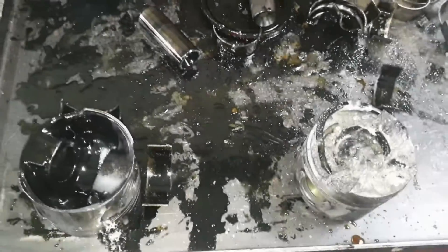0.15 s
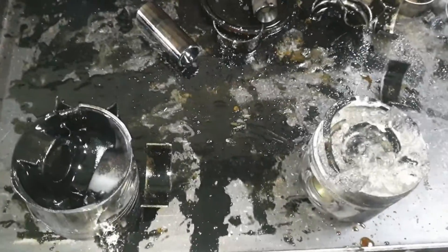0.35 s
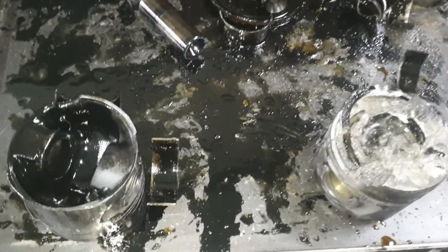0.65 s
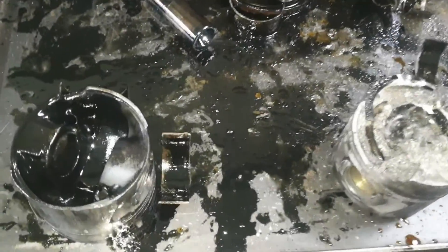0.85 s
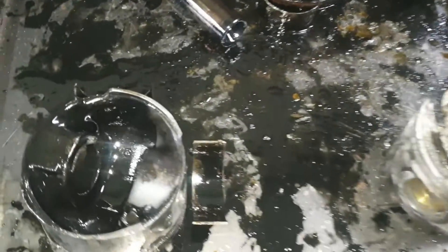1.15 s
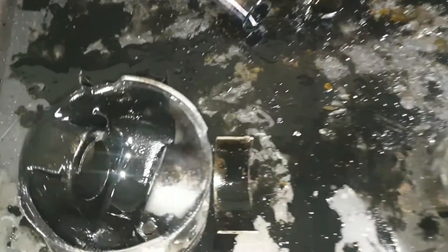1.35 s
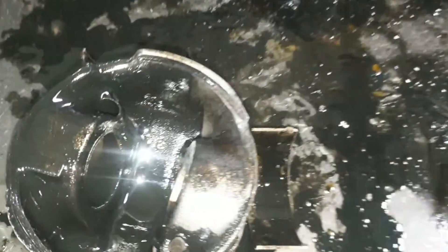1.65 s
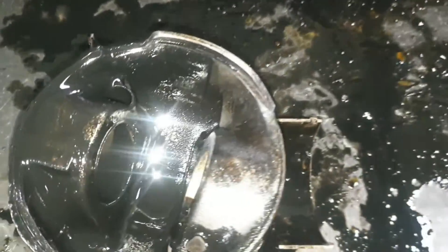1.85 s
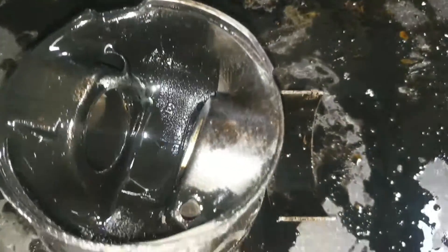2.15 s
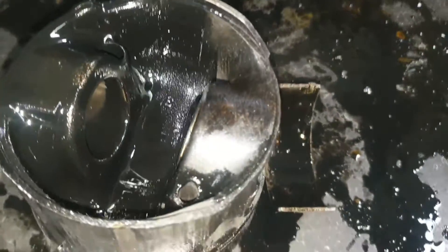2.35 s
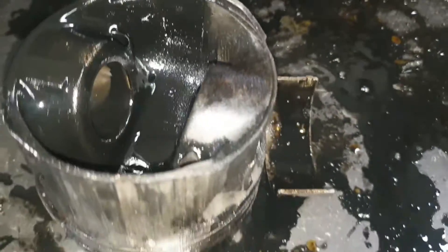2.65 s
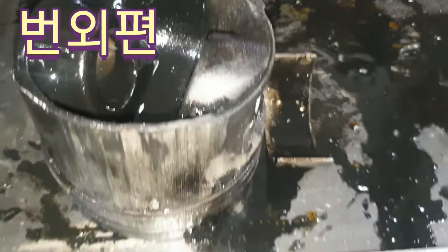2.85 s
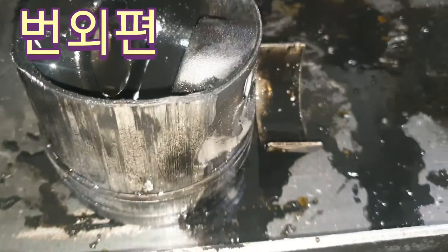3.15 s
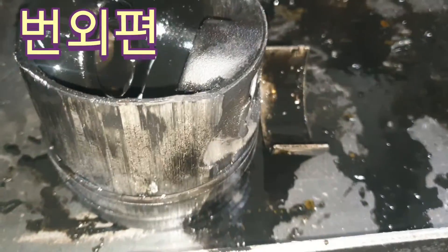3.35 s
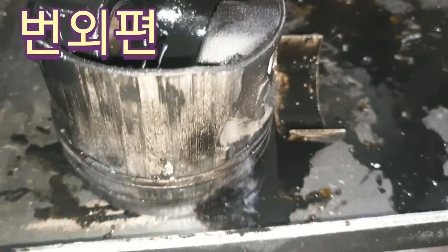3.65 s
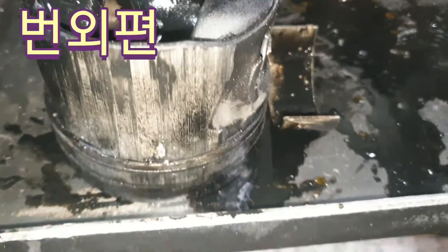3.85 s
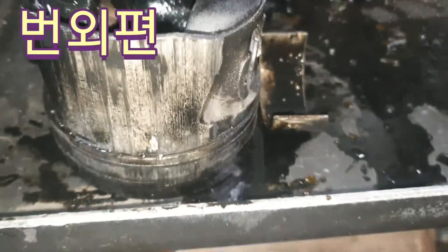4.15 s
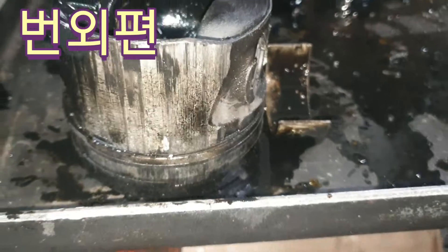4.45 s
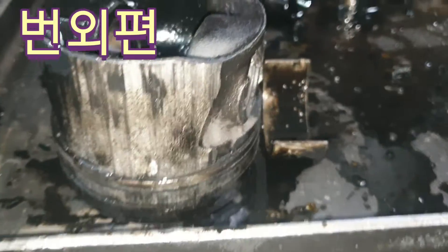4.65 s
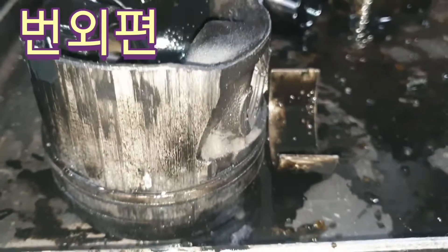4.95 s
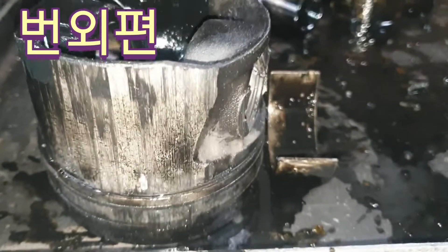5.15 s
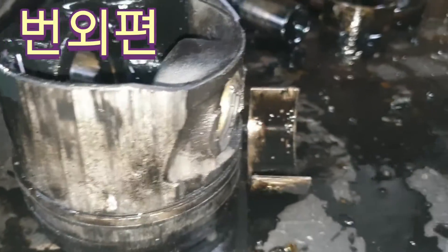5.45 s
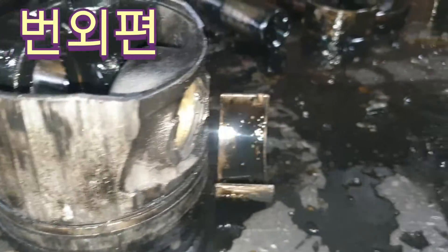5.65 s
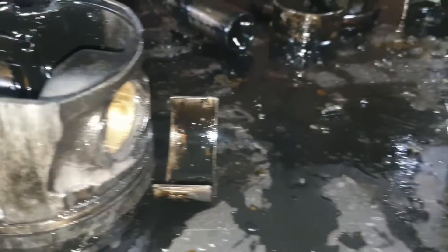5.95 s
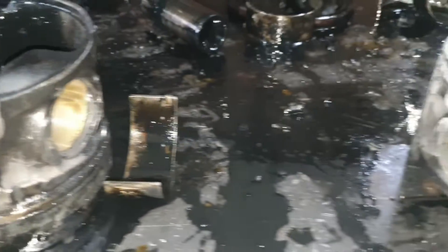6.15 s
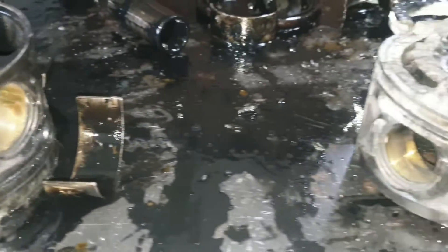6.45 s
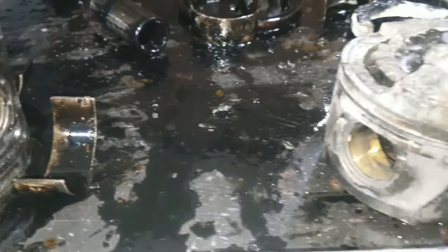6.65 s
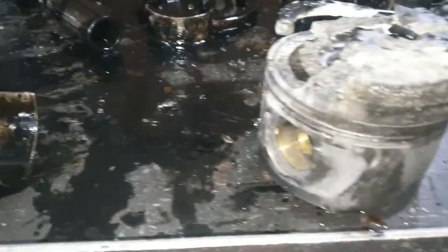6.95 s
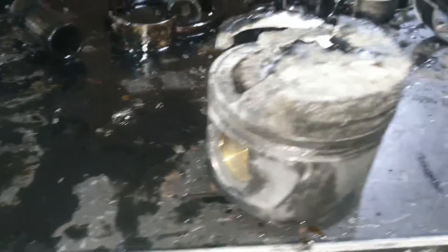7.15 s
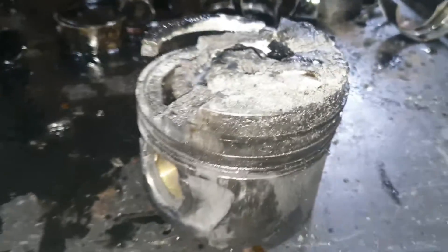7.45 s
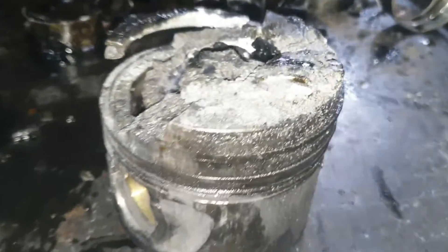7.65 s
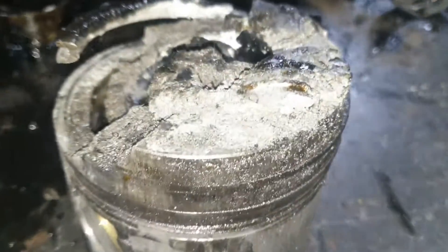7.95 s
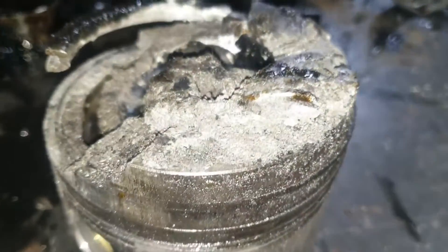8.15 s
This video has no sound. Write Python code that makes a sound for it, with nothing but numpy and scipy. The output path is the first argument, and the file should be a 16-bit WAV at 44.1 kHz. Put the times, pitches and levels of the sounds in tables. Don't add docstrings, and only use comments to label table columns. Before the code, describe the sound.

A pressurised air jet blows over metal engine parts on a bench. First only dull ventilation rumble and a slight swelling leak hiss; then the valve bursts open with two quick spurts. The wide, crisp hiss flutters and shifts between roar and fizz, flares strongly past the six-second point, thins, then whistles brightly near the end. Close handheld stereo microphone, dense short room response, jet stronger on the right.

```python
import sys
import numpy as np
from scipy import signal
from scipy.fft import rfft, irfft, next_fast_len
from scipy.io import wavfile
from scipy.ndimage import uniform_filter1d, map_coordinates

SR = 44100
rng = np.random.default_rng(int(sys.argv[2]) if len(sys.argv) > 2 else 0)


def boost(x):
    u = np.asarray(x, float) / 20
    return 10 ** u


def transcribe(signal):
    frames = np.atleast_2d(signal).T
    limited = np.clip(frames, -1, 1)
    pcm = np.round(limited * 32767).astype(np.int16)
    wavfile.write(sys.argv[1], SR, pcm)


N = 365588

LAYER_HZ = [550, 1500, 3900, 7400, 11500]


def unit(x):
    return x / np.sqrt(np.mean(x ** 2) + 1e-20)


def along(points, hz):
    f, v = np.transpose(points)
    return np.interp(np.log(hz + 1), np.log(f + 1), v)


def curves(rows):
    s, *columns = np.transpose(rows)
    return [np.interp(np.arange(N) / SR, s, column) for column in columns]


def wobble(rate):
    knots = rng.standard_normal(int(N * rate / SR) + 4)
    return map_coordinates(knots, [np.arange(N) * rate / SR])


def filtered(x, response):
    m = next_fast_len(x.shape[-1] + 4096)
    spectrum = rfft(x, m) * response(np.fft.rfftfreq(m, 1 / SR))
    return irfft(spectrum, m)[..., :x.shape[-1]]


def resonance(centre_hz, width_hz):
    return lambda hz: 1 / (1 + (2 * (hz - centre_hz) / width_hz) ** 2)


def pair(n, alike, lag_s, patchy_db):
    z = signal.stft(rng.standard_normal((2, n + 512)), nperseg=512)[2]
    patches = uniform_filter1d(rng.standard_normal(z.shape[1:]), size=3, axis=0)
    patches = uniform_filter1d(patches, size=16, axis=1)
    two = signal.istft(z * boost(patchy_db * unit(patches)), nperseg=512)[1][:, :n]

    def mid_side(hz):
        angle = np.arccos(np.clip(along(alike, hz), -1, 1)) / 2
        return np.array([np.cos(angle), np.sin(angle)])

    mid, side = filtered(two, mid_side)
    ports = np.array([mid + side, mid - side])
    return filtered(ports, lambda hz: np.exp(-1j * np.pi * np.outer([1, -1], hz) * lag_s))


def workshop():
    # time in seconds, level in dB.
    fan = [(0.0, -41.5), (1.34, -40.5), (1.94, -37.5), (2.22, -37), (3.8, -37.5), (4.66, -40),
           (5.42, -38.5), (5.9, -38), (6.72, -41), (8.29, -39.5)]
    # frequency in Hz, level in dB per Hz.
    rumble_colour = [(25, -13.5), (45, -0.5), (140, -4.5), (210, -11), (330, -15.5), (450, -18),
                     (650, -24.5), (1000, -28.5), (1500, -45.5), (2500, -77)]
    # frequency in Hz, width in Hz, level in dB.
    motor_lines = [(53, 4.2, -56), (80.4, 15, -51.5), (145.7, 11, -57), (217.7, 9.1, -64), (424, 2.6, -66),
                   (519, 8, -73.5), (782, 2.8, -71.5), (1460, 5.5, -76.5)]
    # frequency in Hz, likeness as a share.
    shop_alike = [(60, 0.83), (200, 0.92), (380, 0.5), (700, 0.12), (2000, 0.11)]
    # frequency in Hz, level in dB per Hz.
    duct_colour = [(900, -29.5), (1250, -5.5), (1500, -7.5), (2100, -9), (2800, -15.5), (4000, -19.5),
                   (11000, -19.5), (14700, -20.5)]
    # time in seconds, level in dB.
    leak = [
        (0, 3.5),
        (.5, 4),
        (.62, 8),
        (.73, 5.5),
    ]

    fan_db, leak_db = curves(fan)[0], curves(leak)[0]
    air = pair(N, shop_alike, 0, patchy_db=0.0)
    rumble = unit(filtered(air, lambda hz: boost(along(rumble_colour, hz))))
    duct = unit(filtered(air, lambda hz: boost(along(duct_colour, hz))))
    hum = np.zeros(N)
    for line_hz, width_hz, db in motor_lines:
        line = unit(filtered(rng.standard_normal(N), resonance(line_hz, width_hz)))
        follow_db = (fan_db + 41) * (line_hz < 300)
        hum += boost(db + follow_db) * line
    return boost(fan_db - 3.5 + 0.81 * wobble(5)) * rumble + hum + boost(leak_db - 66) * duct


def bench(x):
    t60_s, rise_s, answer_db = .16, .008, -7
    drift = .6
    t = np.arange(SR // 8) / SR
    tails = rng.standard_normal((2, 2, len(t))) * boost(-60 * t / t60_s) * (1 - np.exp(-(t / rise_s) ** 2))
    tails /= np.linalg.norm(tails, axis=2, keepdims=True)
    turn = np.pi * drift * np.arange(N) / SR
    paths = np.array([x * np.cos(turn), x * np.sin(turn)])
    answer = signal.oaconvolve(paths, tails, axes=2).sum(axis=0)[:, :N]
    return (x + boost(answer_db) * answer) / np.sqrt(1 + boost(2 * answer_db))


def bores():
    # time in seconds, half length in seconds, pitch in Hz, width in Hz,
    # level in dB.
    far_bores = [(4.39, .12, 12600, 353, -33), (4.935, .04, 8430, 500, -34), (3.2, 0.052, 8380, 600, -35.5),
                 (4.633, 0.024, 4190, 644, -34), (5.003, 0.059, 1760, 560, -32.5),
                 (6.14, 0.099, 10700, 840, -29.5), (6.51, 0.038, 9450, 2500, -26),
                 (6.432, 0.075, 8265, 835, -24), (6.752, 0.18, 10880, 630, -40.5),
                 (7.831, .12, 8250, 395, -29.5), (2.2, 0.18, 13560, 1300, -33),
                 (4.397, 0.069, 13360, 2100, -28), (6.438, .07, 10200, 1844, -19.5)]
    near_bores = [
        (1.33, 0.13, 2000, 457, -45),
        (1.78, 0.076, 1840, 244, -42.5),
        (2.497, 0.11, 4370, 620, -41),
        (5.74, 0.088, 1797, 350, -41),
        (6.41, .07, 7190, 714, -30),
        (7.79, .07, 5920, 895, -32),
        (7.803, .12, 7280, 705, -24.5),
        (8.158, 0.22, 7170, 640, -37),
        (3.198, 0.071, 13450, 1000, -28.5),
    ]
    held_bores = [(.82, .033, 1995, 400, -46.5), (.995, .075, 2122, 500, -36.5),
                  (1.0, .072, 3600, 450, -41), (1.01, .092, 5350, 220, -44), (2.19, .045, 3990, 260, -35),
                  (2.31, .06, 3930, 260, -39), (2.52, .07, 4970, 300, -42),
                  (5.375, 0.098, 6300, 1500, -38.5), (4.625, .04, 5200, 2500, -35),
                  (5.53, .045, 1997, 597, -35), (6.3, .028, 7600, 1200, -32), (7.83, .135, 7450, 500, -32),
                  (7.83, .13, 8290, 300, -36)]
    # time in seconds, half length in seconds, pitch from in Hz, pitch to in Hz,
    # level in dB.
    cavity = [
        (2.775, .04, 365, 381, -47.5),
        (2.95, .06, 400, 390, -44.5),
        (7.82, .06, 390, 420, -52.5),
        (7.93, .06, 430, 479, -53),
        (8.04, .075, 490, 461, -52),
        (8.14, .05, 430, 413, -51),
    ]
    swell, plateau = 2, 8
    slide = .007

    rows = []
    for s, half, from_hz, to_hz, db in cavity:
        rows.append((s, half, from_hz, to_hz, 14, db, -2.2, swell))
    # its bores, left-right in dB, steepness
    parts = (far_bores, -0.1, swell), (near_bores, -4.5, swell), (held_bores, -2, plateau)
    for part, pan_db, edge in parts:
        for s, half, hz, width_hz, db in part:
            u = slide * rng.standard_normal()
            rows.append((s, half, hz * (1 - u), hz * (1 + u), width_hz, db, pan_db, edge))

    out = np.zeros((2, N + SR))
    for s, half, from_hz, to_hz, width_hz, db, pan_db, edge in rows:
        reach = round(2 * half * SR)
        t = np.arange(-reach, reach) / SR
        slow = filtered(rng.standard_normal((4, len(t))), resonance(0, width_hz))
        phase = 2 * np.pi * np.cumsum(from_hz + (to_hz - from_hz) * (.5 + t / half / 2)) / SR
        tone = unit(slow[:2] * np.cos(phase) + slow[2:] * np.sin(phase))
        gain = boost([[db + pan_db / 2], [db - pan_db / 2]])
        start = round((s + t[0]) * SR)
        out[:, start:][:, :len(t)] += gain * tone * np.exp(-np.abs(t / half) ** edge)
    return out[:, :N]


def valve():
    open_s, rise_s = 0.734, 0.021
    return np.clip((np.arange(N) / SR - open_s) / rise_s, 0, 1)


def spurts_db():
    # time in seconds, rise in dB, decay in seconds.
    spurts = [
        (0.84, 5, 0.069),
        (.918, 3, 0.086),
        (4.584, 0, .04),
        (5.274, 2.5, 0.052),
        (5.753, 1, 0.022),
        (6.275, 2.5, 0.035),
        (6.378, 2, 0.035),
        (7.69, 0, .04),
    ]
    t = np.arange(N) / SR
    return sum(db * (t > s) * np.exp(-np.abs(t - s) / decay) for s, db, decay in spurts)


def sweep_db():
    # time in seconds, flow in dB, squareness on a flat face in dB.
    jet_path = [(.76, -40.5, 10), (.9, -40, 13), (1.03, -31, 8), (1.25, -32, 2.5), (1.8, -27, 1),
                (2.22, -25.5, -2), (2.9, -29, -2.5), (3.55, -26.5, -5), (4.0, -29, -2), (4.4, -27.5, 1.05),
                (5.2, -28, 4.5), (5.5, -26, 0), (5.95, -26.5, -3), (6.55, -26.5, -13), (7.0, -33.5, -3),
                (7.4, -28, -4.5), (7.62, -29, 3), (8.29, -30.5, -5)]
    layer_levels = [-22.5, -16.5, -11.5, -12, -1.5]
    face_shares = [.75, 1.01, .3, -.1, -.2]
    # time in seconds, rise in dB, half length in seconds,
    # brightest frequency in Hz.
    flares = [(0.832, 4, 0.079, 7600), (0.938, 3.5, 0.023, 4040), (0.998, 4.5, 0.089, 6500),
              (1.06, 1.5, 0.023, 4000), (1.847, 2, 0.05, 1100), (2.513, 1.5, 0.046, 2980),
              (2.57, 2.5, 0.027, 7000), (2.776, 1.5, 0.023, 13000), (2.9, 1.5, .04, 8500),
              (3.22, 4.5, 0.069, 2790), (3.332, 2, 0.042, 3400), (3.702, 5, 0.3, 484),
              (2.07, 2, 0.034, 16100), (2.66, 4.5, 0.11, 1530), (3.207, 5.5, 0.049, 12300),
              (3.464, 1, 0.014, 12800), (3.557, 1.5, 0.029, 8800), (3.756, 4, 0.034, 12000),
              (3.882, 7, 0.056, 1360), (4.101, 2.5, 0.049, 13100), (4.105, 5.5, 0.076, 1170),
              (4.36, 4, 0.2, 15600), (4.48, 2.5, .054, 15000), (4.628, 6.5, 0.032, 4420),
              (4.791, 10.5, 0.038, 18900), (4.942, 6, 0.031, 14800), (5.026, 5.5, 0.068, 1080),
              (5.4, 4.5, 0.18, 6930), (5.77, 5.5, 0.015, 12000), (5.886, 6, 0.074, 14840),
              (6.13, 2, 0.06, 9100), (6.256, 3, 0.042, 8550), (6.343, 1.5, 0.033, 13000),
              (2.05, 0, 0.092, 12500), (6.308, 9, 0.024, 10700), (6.427, 5.5, 0.097, 1690),
              (6.433, 10.5, 0.062, 8930), (6.511, 1, .03, 6000), (6.62, 3.5, 0.032, 8560),
              (3.097, 3, 0.045, 1400), (.885, 5, .03, 4500), (1.983, 2, .08, 13100),
              (6.573, 4.5, 0.095, 1690), (2.075, 0.5, .02, 9000), (5.95, 1, .08, 2200),
              (6.057, 3.5, .04, 1770), (6.699, 3, 0.047, 11800), (6.865, 3.5, 0.017, 7000),
              (7.237, 3, 0.034, 12100), (7.432, 3.5, 0.071, 1190), (8.035, 3.5, .04, 4530),
              (7.816, 10, 0.096, 6620), (8.155, 5, 0.071, 12800), (8.28, 3.5, 0.025, 13000)]
    # time in seconds, change in dB, half length in seconds, most affected frequency in Hz.
    gaps = [(1.155, -3, 0.28, 20000), (0.762, -20, 0.028, 2180), (1.928, -3.5, 0.045, 6700),
            (2.019, -6.5, 0.14, 1740), (2.506, -3, 0.069, 10200), (2.783, -4.5, 0.034, 1400),
            (2.84, -3.5, 0.1, 3000), (3.132, -7.5, 0.11, 1120), (3.435, -2.5, 0.029, 7600),
            (3.663, -4.5, 0.052, 6160), (4.007, -5, 0.057, 3960), (4.825, -9, 0.053, 1500),
            (5.191, -6.5, 0.14, 4470), (5.528, -4, 0.046, 11100), (5.419, -7.5, 0.08, 1400),
            (5.42, -3, 0.37, 20000), (5.865, -9.5, 0.053, 653), (5.994, -4.5, .055, 14100),
            (6.25, -6.5, 0.035, 8940), (6.355, -5.5, 0.035, 14040), (6.664, -4, 0.16, 710),
            (7.098, -3, 0.051, 11700), (7.509, -4, 0.083, 15900), (7.671, -8, 0.051, 890),
            (7.989, -7.5, 0.063, 900), (8.002, 0.5, 0.065, 14040), (0.886, -10.5, 0.048, 3300),
            (1.27, -2.5, .06, 500), (1.7, -1.5, .035, 5900), (2.28, -0.5, 0.028, 10000),
            (2.444, -6.5, 0.18, 495), (3.828, -3.5, 0.097, 2440), (4.77, 0.5, 0.017, 6000),
            (4.87, -1.5, 0.033, 6100), (5.725, -3, 0.018, 11000), (6.098, -2, 0.03, 5000),
            (6.305, -2.5, 0.054, 3370), (6.458, -6.5, .1, 404), (2.25, -1, .25, 1260),
            (8.026, -1, 0.062, 1250), (1.004, -4, 0.083, 1100), (6.473, 0, 0.017, 10000),
            (1.78, -2, 0.11, 2180), (4.707, -1, 0.094, 2190), (6.583, -5, 0.083, 450),
            (6.8, -3, 0.067, 800), (3.225, -2.5, 0.036, 700), (3.483, -1.5, 0.18, 1010),
            (2.74, -2.5, 0.011, 9000), (6.62, -2.5, .15, 2290), (5.47, -1.5, .035, 4500),
            (6.762, -1, .03, 2940), (7.048, -0.5, 0.058, 3400), (8.22, -2.5, 0.053, 3380),
            (2.149, -5, .03, 800),
        (2.34, -4.5, .04, 700),
        (4.602, -3.5, .04, 798),
        (6.56, -4, .07, 800),
        (8.15, -4, .05, 600),
        (3.17, -2.5, .1, 6000),
        (4.39, -1.5, .1, 8500),
        (4.72, -3, .04, 3500),
        (6.1, -1.5, .1, 4300),
        (6.47, -3, .05, 1200),
    ]
    colour_spread = 0.91
    rim_s, rim_rise_s, rim_db = 7.7, 0.067, 5

    flow_db, face_db = curves(jet_path)
    t = np.arange(0, N, 64) / SR
    s, db, half, hz = np.transpose(flares + gaps)[..., None]
    by_layer = db * np.exp(-(np.log(hz / LAYER_HZ) / colour_spread) ** 2)
    passes = by_layer.T @ np.exp(-((t - s) / half) ** 2)
    passes[3] += rim_db * np.clip((t - rim_s) / rim_rise_s + .5, 0, 1)
    levels = []
    for level_db, share, change_db in zip(layer_levels, face_shares, passes):
        levels.append(flow_db + level_db + share * face_db + np.interp(np.arange(N) / SR, t, change_db))
    return levels


def jet():
    # frequency in Hz, level in dB per Hz.
    air_colour = [(210, -8), (350, -12), (645, -13), (742, -7.5), (896, -17), (1030, -9.5), (1810, -5.5),
                  (2480, -2.5), (3970, -1), (7790, 3), (11000, 9.5), (13500, 7), (14800, 8.5)]
    # frequency in Hz, likeness as a share.
    jet_alike = [(400, .5), (700, .6), (1000, 0.4), (2000, 0.68), (3500, 0.33), (7000, 0.26), (10000, 0.45),
                 (13000, 0.55)]
    # time in seconds, left-right in dB.
    sway = [
        (.74, 0.4),
        (2.5, 0.74),
        (6.1, -1),
        (6.4, -0.3),
        (7.62, -0.8),
        (7.76, -3),
        (8.29, -0.1),
    ]
    lag_s = 23 / 44100

    air = pair(N, jet_alike, lag_s, patchy_db=2.0)
    air = air * boost(0.51 * rng.standard_normal(N))
    flutter_db = spurts_db() + .5 * wobble(14) + .4 * wobble(40)
    out = np.zeros((2, N))
    for k, level_db in enumerate(sweep_db()):
        share = list(zip(LAYER_HZ, np.arange(len(LAYER_HZ)) == k))
        layer = filtered(air, lambda hz: boost(along(air_colour, hz)) * np.sin(np.pi / 2 * along(share, hz)) ** 2)
        out += boost(level_db + 1.5 + flutter_db + .45 * wobble(12)) * unit(layer)
    sway_db = curves(sway)[0] + 0.73 * wobble(9)
    return valve() * out * boost(np.outer([.5, -.5], sway_db))


def scene():
    return bench(jet() + bores()) + workshop()


def low_pass(x):
    return signal.sosfilt(signal.butter(12, 14930, fs=SR, output="sos"), x)


def record(dry):
    # frequency in Hz, left-right in dB.
    port_colour = [(60, -2.3), (300, -1.6), (700, -2), (1300, -2), (2700, -1.5), (4000, -3.5), (5500, -7.5),
                   (7500, -10), (8300, -5.5), (11000, -5), (14500, 0.5)]

    def response(hz):
        bass_cut = 1 + (36 / (hz + 1)) ** 6
        return boost(np.outer([.5, -.5], along(port_colour, hz))) / bass_cut

    ports = filtered(dry, response)
    ports = .8 * np.tanh(ports / .8)
    return low_pass(ports)


dry = scene()
out = record(dry)
transcribe(out)
```